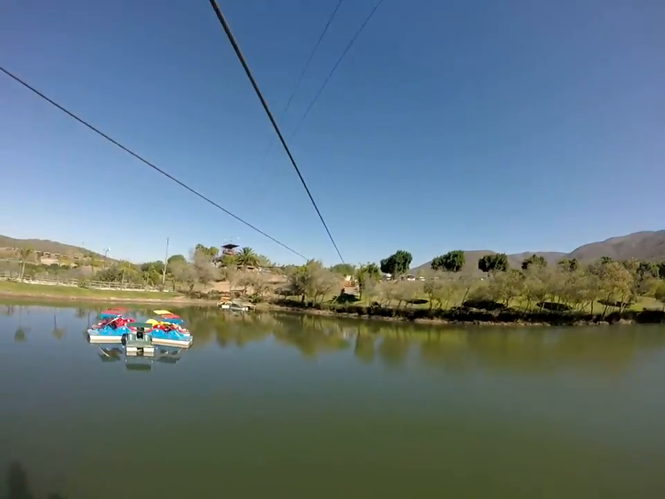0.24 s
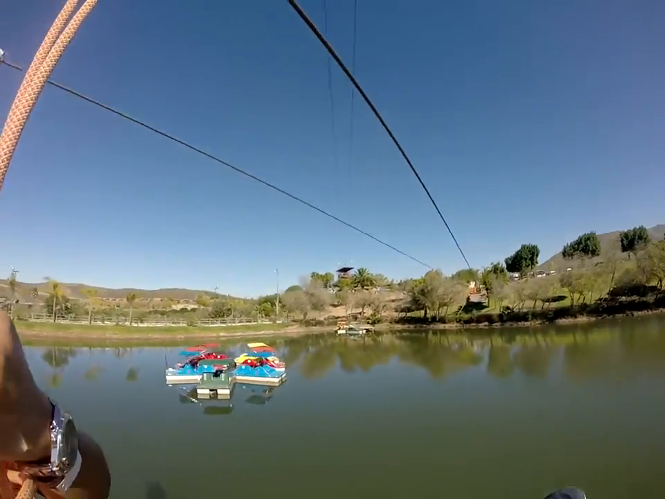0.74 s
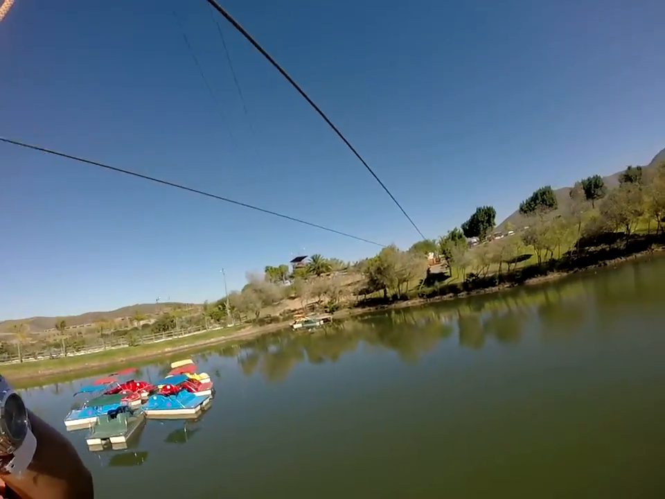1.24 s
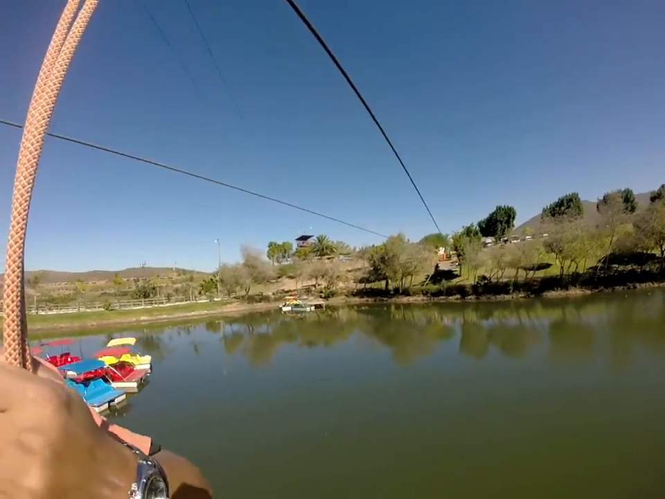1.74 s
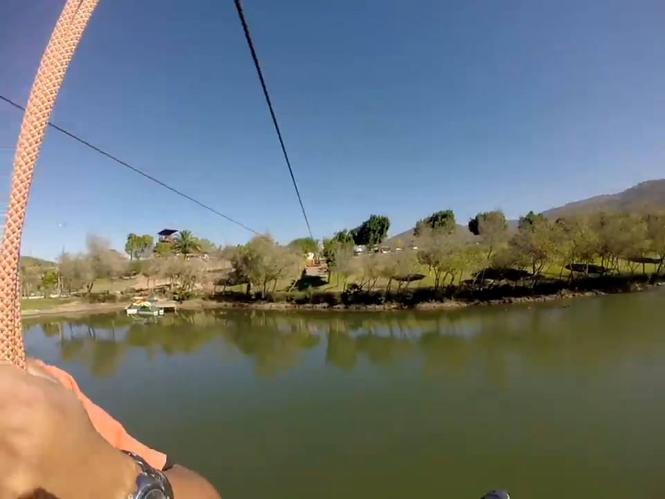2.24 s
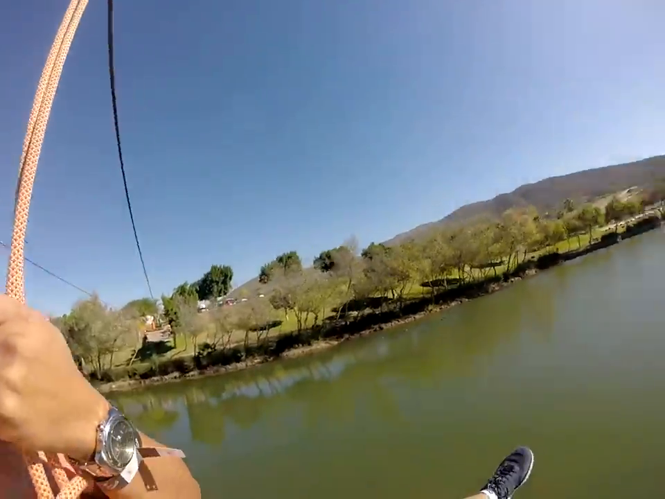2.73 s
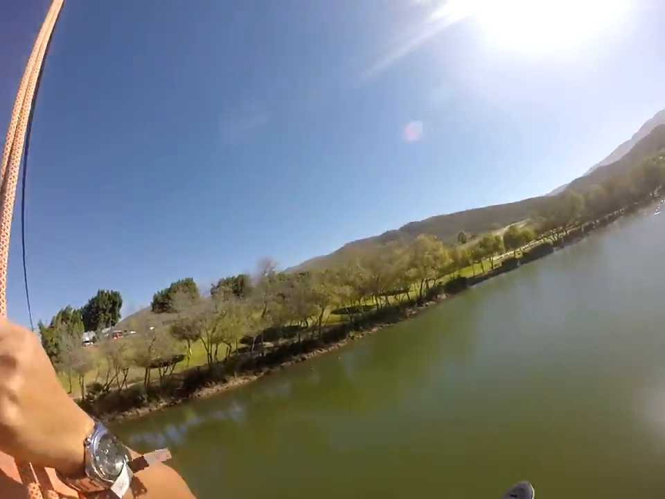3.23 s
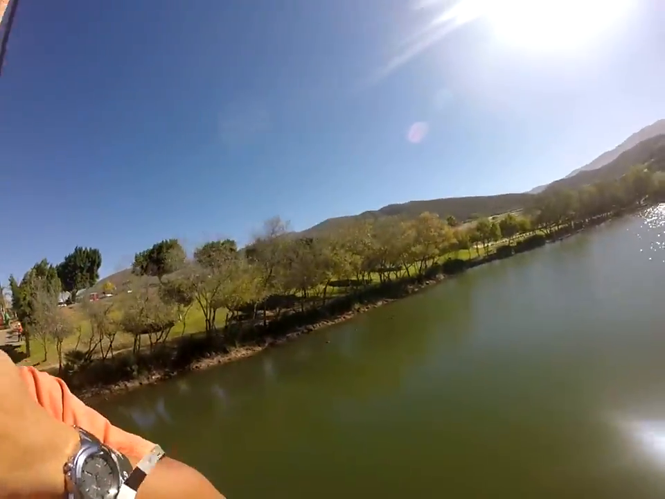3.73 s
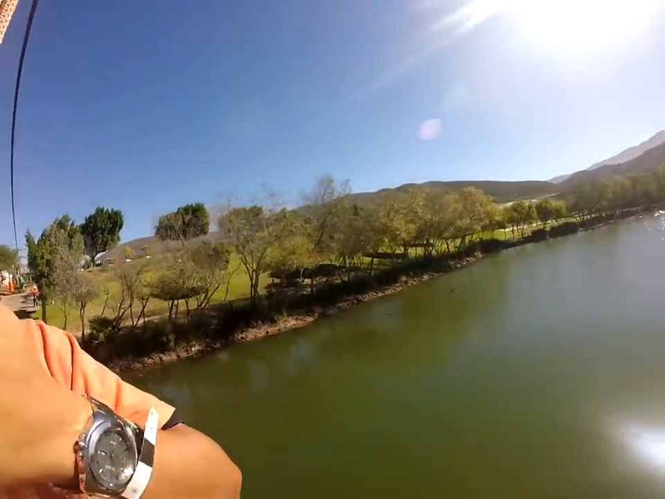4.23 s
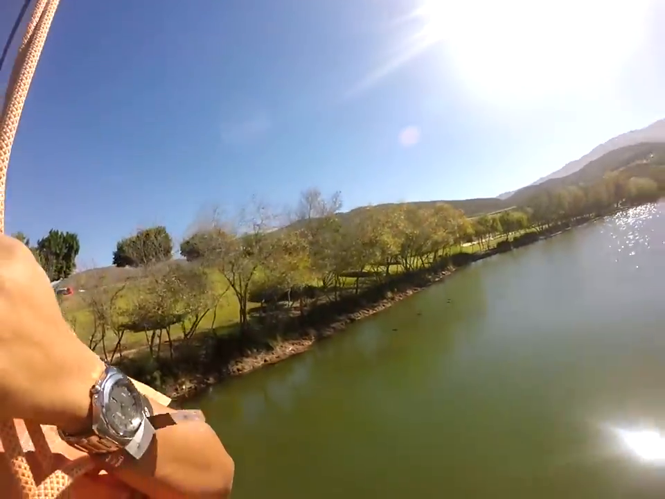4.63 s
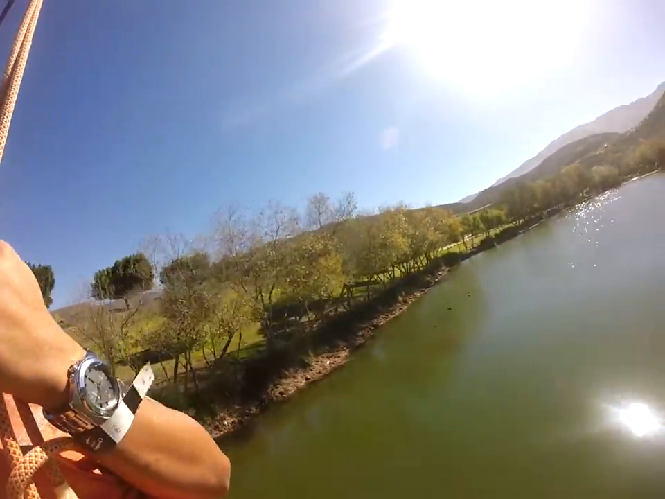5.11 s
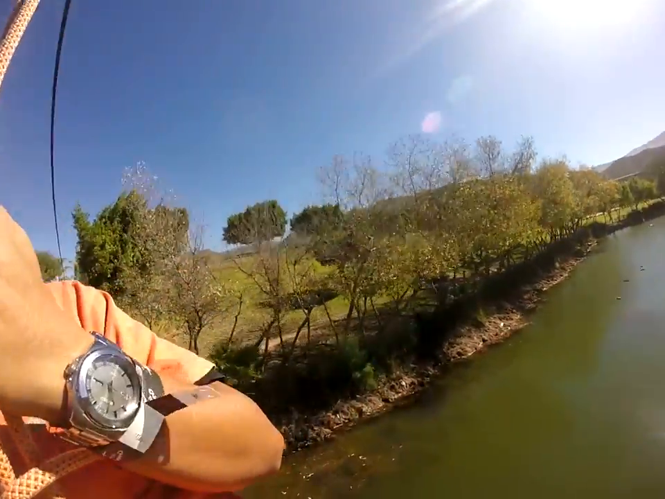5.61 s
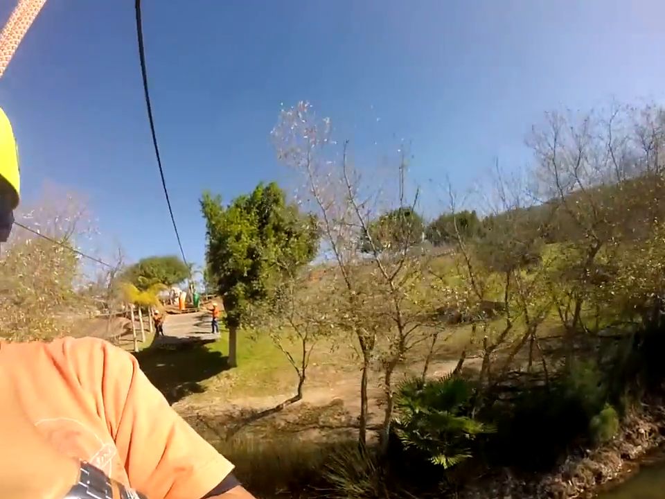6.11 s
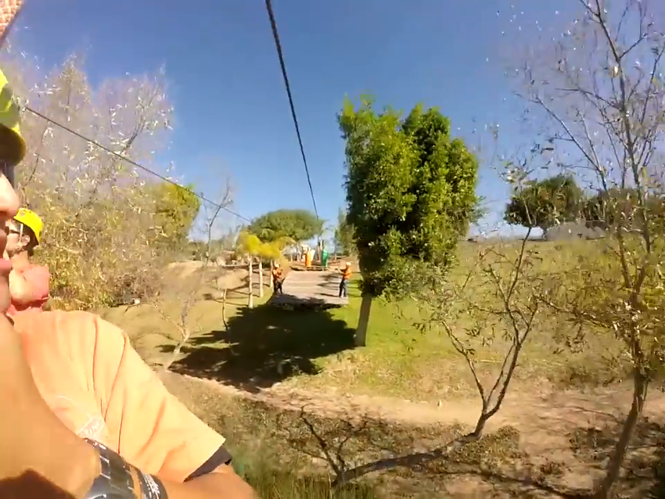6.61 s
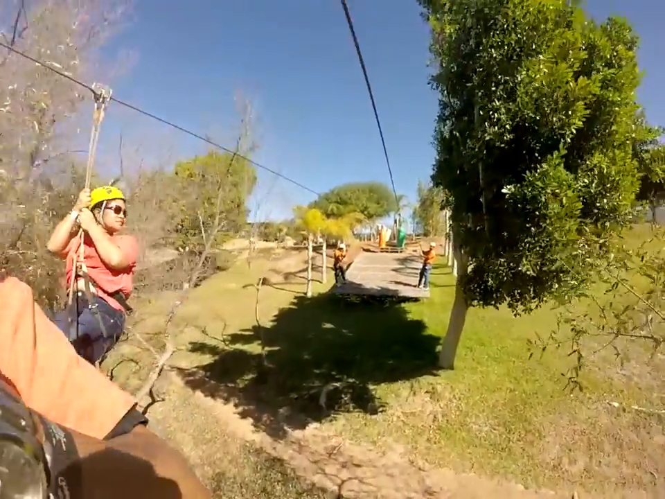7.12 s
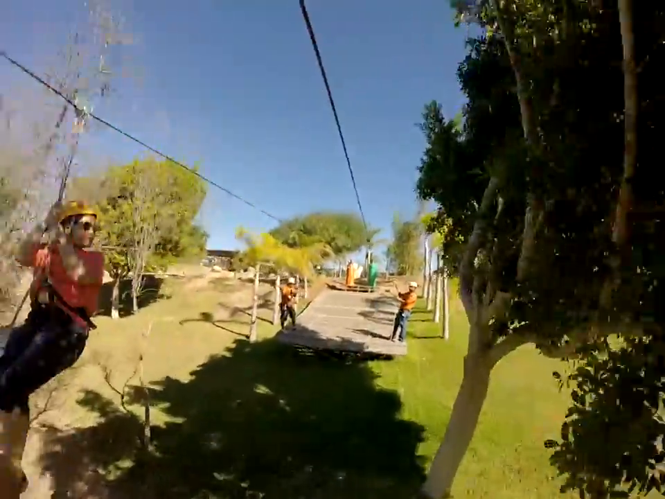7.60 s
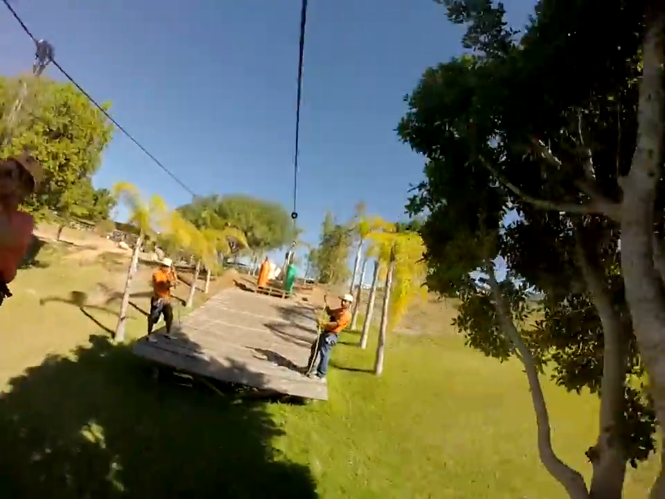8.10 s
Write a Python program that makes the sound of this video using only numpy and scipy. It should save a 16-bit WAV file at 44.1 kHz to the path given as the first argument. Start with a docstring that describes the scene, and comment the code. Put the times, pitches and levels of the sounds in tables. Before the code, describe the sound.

Steady metallic zing of wheels on a zipline, heard close by the rider, gradually slowing as wind flutters and thumps and clacks cluster at the end.

```python
"""Zipline ride

A zipline trolley runs along a steel cable, slowly losing speed, heard from a camera carried by the rider.
Rough contact filtered by steel resonances makes the wheels ring; the strands add a falling harmonic whine.
Both swell as the rider swings. Wind noise rumbles and flutters on the housing.
Gear bumps and taps, most of them near the landing, excite decaying modes; a strap rubs near the end."""
import sys
import numpy as np
from scipy import signal
from scipy.fft import rfft, irfft
from scipy.io import wavfile
from scipy.ndimage import uniform_filter1d, minimum_filter1d, map_coordinates

SR = 44100
rng = np.random.default_rng(int(sys.argv[2]) if len(sys.argv) > 2 else 0)


def generate_wav(sig):
    """Save sig (samples, or channels by samples) to the path in sys.argv[1] as 16-bit PCM at SR."""
    pcm = np.round(np.clip(np.atleast_2d(sig).T, -1, 1) * 32767).astype(np.int16)
    wavfile.write(sys.argv[1], SR, pcm)


N = 368235
T = np.arange(N) / SR  # s
FREQS = np.maximum(np.arange(N // 2 + 1) * SR / N, 1)  # Hz, kept above zero for logarithms

# strands passing under the wheels per second, as the run begins
START_HZ = 658

# modes of the camera housing: (frequency [Hz], 60 dB decay time [s], relative level [dB])
HOUSING_MODES = [(164, 0.086, -5), (288, 0.023, -15), (424, 0.021, -8.5), (518, 0.055, -6.5),
                 (742, 0.11, -5), (788, 0.042, 4.5), (955, 0.022, 11.5), (1210, 0.011, 12),
                 (1430, 0.048, 3.5), (1490, 0.0097, -6), (2170, 0.023, 6.5), (2450, 0.012, 10)]


def undb(db):
    """Amplitude gain is ten to the power of the level in decibels over twenty."""
    return 10 ** (np.asarray(db) / 20)


def unit(x):
    """Normalisation: division by the root mean square gives rms 1."""
    return x / np.sqrt(np.mean(x ** 2))


def curves(table):
    """Linear interpolation over time of each column after the first, which holds the times."""
    times, *columns = np.transpose(table)
    return [np.interp(T, times, column) for column in columns]


def response(points, hz):
    """Frequency response: gain from (frequency [Hz], level [dB]) points on a logarithmic frequency axis."""
    point_hz, db = np.transpose(points)
    return undb(np.interp(np.log(hz), np.log(point_hz), db))


def shape(x, gain):
    """Linear filtering: multiplication of the spectrum by a gain for each frequency."""
    return irfft(rfft(x) * gain, N)


def noise(points):
    """Coloured noise: white noise shaped by a frequency response, rms 1."""
    return unit(shape(rng.standard_normal(N), response(points, FREQS)))


def walk(cutoff_hz):
    """Slow random motion: white noise low-passed to half amplitude at the cutoff, rms 1."""
    return unit(shape(rng.standard_normal(N), 1 / (1 + (FREQS / cutoff_hz) ** 4)))


def add(out, s, sound):
    """Superposition: a sound is summed into the output from time s [s]."""
    start = int(max(s, 0) * SR)
    out[start:start + len(sound)] += sound[:max(N - start, 0)]


def hump(s, length):
    """Raised-cosine envelope: it rises to 1 at time s and falls back to 0, lasting length [s] in all."""
    return np.cos(np.pi * np.clip((T - s) / length, -.5, .5)) ** 2


def swing(lead_s):
    """Pendulum motion of the rider under the trolley: a sinusoid between -1 and 1."""
    period_s, heaviest_load_s = 1.773, 0.26
    return np.cos(2 * np.pi * (T + lead_s - heaviest_load_s) / period_s)


def dips():
    """Level modulation in dB: ring and whine duck suddenly, as if camera gain fell, then recover as a Gaussian."""
    # sudden ducks in level: (time [s], depth [dB])
    ducks = [(.29, -2.5), (2.3, -2), (2.85, -1), (6.03, -3.5), (7.27, -1.6), (7.95, -4)]
    fall_s, recover_s = 0.021, 0.48
    level_db = 0
    for s, db in ducks:
        fall = np.clip((T - s) / fall_s, 0, 1)
        recovery = np.exp(-((T - s) / recover_s) ** 2)
        level_db = level_db + db * fall * recovery
    return level_db


def wind(buffet_db=2.5):
    """Turbulence: eddies buffet the housing with a deep rumble and a lighter flutter, varied by gusts."""
    # spectrum of the rumble: (frequency [Hz], level [dB])
    rumble_colour = [(10, -4), (25, 5.5), (50, 1.5), (70, -1.5), (98, -1), (130, -15.5), (200, -21.5),
                     (400, -36)]
    # spectrum of the flutter: (frequency [Hz], level [dB])
    flutter_colour = [(80, -16), (150, 2), (230, -0.5), (330, -8.5), (700, -6.5), (1000, -10.5),
                      (2000, -40)]
    # gusts: (time of the height [s], length [s], change of the rumble [dB], change of the flutter [dB])
    gusts = [(.05, 1.2, 4, 11), (1.46, 1.88, 6.5, 18.5), (2.22, 0.63, 0, 13.5), (2.85, 1.1, 6, 10.5),
             (4.073, 1.23, 10, -12), (5.153, 1.66, 8.5, 8.5), (8.208, 0.8, 13, 8)]
    rumble_db, flutter_db = -40, -59.5  # steady airflow
    for s, length, rumble_change_db, flutter_change_db in gusts:
        gust = hump(s, length)
        rumble_db = rumble_db + rumble_change_db * gust
        flutter_db = flutter_db + flutter_change_db * gust
    rumble = noise(rumble_colour) * undb(rumble_db)
    flutter = noise(flutter_colour) * undb(flutter_db)
    return undb(buffet_db * walk(7.4)) * (rumble + flutter)


def ring(modes, scatter, tilt_db=0):
    """Modal response to one blow: a sum of decaying sines, peak 1, each blow on a slightly different spot."""
    t = T[:SR // 4]
    lowest_hz = modes[0][0]
    out = 0
    for hz, t60, db in modes:
        detune, strength = rng.standard_normal(2)
        # the tilt, in dB per octave, brightens or dulls the blow
        gain = undb(db + 1.2 * strength + tilt_db * np.log2(hz / lowest_hz))
        decay = np.exp(-np.log(1000) * t / t60)
        out = out + gain * np.sin(2 * np.pi * hz * (1 + scatter * detune) * t) * decay
    return out / np.abs(out).max()


def clack(tilt_db, chatter=0.057, chatter_s=0.0053):
    """Impact excitation: an impulse and brief random chatter of the gear ring the housing, peak 1."""
    t = T[:SR // 100]
    force = (t == 0) + chatter * rng.standard_normal(len(t)) * np.exp(-t / chatter_s)
    sound = signal.fftconvolve(force, ring(HOUSING_MODES, scatter=0.083, tilt_db=tilt_db))
    return sound / np.abs(sound).max()


def bumps(push_s=0.0055):
    """Soft impact: a smooth push of finite length excites mostly the low modes of the camera mount."""
    # bumps: (time [s], level before the push smooths the blow [dB])
    bump_times = [(0.183, -19), (0.461, -12), (.479, -11), (.973, -17.5), (1.07, -19.5), (1.78, -19.5),
                  (5.316, -9), (6.051, -2), (7.307, -3), (7.378, -8), (7.482, -14.5), (7.521, -8),
                  (7.539, -6), (7.956, -5.5), (7.973, -13.5), (8.003, -11), (8.064, -6.5), (8.175, -5.5),
                  (8.238, -9), (8.266, -11), (8.34, -11)]
    # mount modes: (frequency [Hz], 60 dB decay time [s], relative level [dB])
    mount_modes = [(48.3, 0.15, -2), (97.2, 0.13, 10), (125.7, 0.1, 7.5), (170, 0.043, -34),
                   (246, 0.057, -3.5)]
    out = np.zeros(N)
    push = np.hanning(int(push_s * SR) + 3)
    push = push / push.sum()
    for s, db in bump_times:
        blow = np.convolve(ring(mount_modes, scatter=0.084), push)
        add(out, s - push_s / 2, undb(db) * blow)
    return out


def taps(lift_db=1):
    """Hard impact: short blows of gear excite the housing's modes."""
    # taps: (time [s], peak level before the common lift [dB], brightness [dB per octave])
    tap_times = [(0.184, -21.5, -1), (0.454, -16, -8), (.974, -14.5, -5), (1.073, -18, -5),
                 (1.782, -18.5, -2), (5.315, -6, 2), (6.05, -4.5, -9.5), (6.16, -27, -4), (7.315, -23, 0),
                 (7.373, -5, 8.5), (7.478, -20.5, -2), (7.502, -19, -8), (7.521, -12.5, -5),
                 (7.564, -23, 1), (7.592, -18, -3), (7.635, -24, -4), (7.657, -14, 6), (7.689, -22, -2),
                 (7.91, -20, 2), (7.947, -13, 4), (8.131, -16.5, 5), (8.228, -24, -11)]
    out = np.zeros(N)
    for s, db, tilt_db in tap_times:
        add(out, s, undb(db + lift_db) * clack(tilt_db))
    return out


def strap_rub():
    """Stick-slip friction: a strap scrapes over the housing in tiny random slips that ring its modes."""
    # strength of the rub: (time [s], level [dB])
    rub = [(8.17, -62), (8.235, -29), (8.262, -27), (8.29, -48), (8.33, -60)]
    slips = rng.standard_normal(N) * (rng.random(N) < 500 / SR)  # about 500 per second
    scrape = signal.fftconvolve(slips, ring(HOUSING_MODES, scatter=0.02, tilt_db=-1))[:N]
    started = T > rub[0][0]
    return unit(scrape) * undb(curves(rub)[0]) * started


def tone(hz, flutter, waver_db=2.0, wobble=0.002988):
    """Frequency and amplitude modulation: a sine unsteady in pitch and strength, rms 1."""
    unsteady_hz = hz * (1 + flutter * walk(62.0) + wobble * walk(6.27))
    phase = 2 * np.pi * np.cumsum(unsteady_hz) / SR
    return unit(np.sin(phase) * undb(waver_db * walk(32)))


def cable_rush(trim_db=-0.5):
    """Broadband noise: the cable's dull rush, slowly varied in level."""
    # strength of the rush: (time [s], level before the trim [dB])
    rush = [(0.0, -40.5), (0.49, -37.5), (1.42, -34), (2.37, -36.5), (5.6, -39), (5.95, -43), (6.4, -41),
            (7.2, -37.5), (8.35, -35.5)]
    # spectrum of the rush: (frequency [Hz], level [dB])
    rush_colour = [(200, -10), (450, -14), (800, -12.5), (1100, -6), (1420, 1), (1580, -8), (1930, 4),
                   (2300, -10.5), (3000, 6), (5000, -23), (15000, -45)]
    return noise(rush_colour) * undb(curves(rush)[0] + trim_db + 0.55 * walk(43))


def strand_whine(strand_hz):
    """Periodic excitation: twisted strands bump the wheels, giving harmonics that fall with speed."""
    # strand harmonics: (multiple of the strand rate, relative level [dB], pitch flutter [share of pitch])
    harmonics = [(1, 2, .014), (2, -0.5, 0.0087), (3, 0, 0.00567), (4, -2.5, 0.00803)]
    # how strongly the frame radiates a harmonic: (frequency [Hz], gain [dB])
    frame = [(400, -69.5), (580, -58), (680, -59.5), (850, -64.5), (1020, -54), (1200, -50.5), (1370, -46),
             (1520, -52), (1720, -46), (1950, -43.5), (2300, -49), (2480, -48), (2620, -33.5)]
    level_db, swing_db, lead_s = 1.22, 1.5, 0.42
    whine_db = level_db + swing_db * swing(lead_s) + dips()
    out = 0
    for multiple, db, flutter in harmonics:
        hz = multiple * strand_hz
        out = out + tone(hz, flutter) * response(frame, hz) * undb(db + whine_db)
    return out


def early_whine(overtone_db=-5):
    """Two-partial tone: a second whine and its octave fall in pitch and sink away early."""
    # course of the whine: (time [s], frequency [Hz], level [dB])
    whine = [(0, 900, -41), (.15, 894, -42), (.5, 844, -48.5), (.9, 760, -49), (1.4, 710, -109)]
    hz, db = curves(whine)
    fundamental = tone(hz, 0.0044, wobble=0.009)
    octave = tone(2 * hz, 0.0032)
    return undb(db) * (fundamental + undb(overtone_db) * octave)


def contact(strand_hz, strands_per_turn=11.8, repeat_db=-7, judder_db=0.36):
    """Roughness excitation: ever new cable roughness plus that of two wheels, which returns every turn."""
    turns = np.cumsum(strand_hz) / SR / strands_per_turn
    force = rng.standard_normal(N)
    for _ in range(2):
        tread = rng.standard_normal(size=640)
        slip = np.cumsum(.1 * walk(6.037)) / SR  # turns
        place = (turns + slip) % 1 * len(tread)
        force = force + undb(repeat_db) * map_coordinates(tread, [place], order=3, mode="grid-wrap")
    return force * undb(judder_db * walk(36))


def trolley_ring(strand_hz, wander_db=4.0):
    """Resonance: the contact force rings the steel, and the turn of the rider's body sets which modes carry."""
    # wheel and side-plate resonances: (frequency [Hz], width where the gain is 4.5 dB down [Hz],
    # level facing ahead [dB], level sideways [dB], level leaning out [dB])
    resonances = [(2623, 78, -14.5, -21.5, -16.5), (2820, 105, -29, -15.5, -18.5),
                  (3285, 340, -9.5, -6.5, -8), (3400, 95, -19.5, -7, -5), (3554, 94, 0.5, 4, 7.5),
                  (3732, 50, -15, -10.5, -19), (3990, 155, -13, -9.5, -14), (4153, 53, -21, -20, -26),
                  (4477, 134, -22.5, -19.5, -24), (4916, 580, -14.5, -22, -26),
                  (5590, 190, -24.5, -23.5, -29), (6050, 170, -16.5, -15.5, -17),
                  (6456, 280, -16, -12.5, -41), (7036, 167, -16, -25, -14.5), (7470, 310, -34, -30, -27),
                  (8245, 330, -23.5, -29.5, -32), (9590, 720, -29, -32.5, -28),
                  (10620, 150, -30, -29.5, -52), (11400, 490, -43, -42, -51), (12600, 310, -44, -37, -54),
                  (12950, 360, -41, -42, -45), (13600, 1900, -45, -57, -58)]
    # the rider swivels and shades the trolley: (time [s], pose [0 ahead, 1 sideways, 2 leaning out])
    poses = [(2, 0), (3, 0.71), (4.5, 0.54), (6.5, 1.26), (6.9, 1.44), (8.35, 1.7)]
    # two plate modes cancel here
    notch_hz, notch_width_hz, notch_db = 4270, 87, -10.5
    notch = undb(notch_db * np.exp(-((FREQS - notch_hz) / notch_width_hz) ** 2))
    force = rfft(contact(strand_hz)) * notch
    pose, = curves(poses)
    steel = 0
    for hz, width, *pose_db in resonances:
        mode = irfft(force / (1 + (1.64 * (FREQS - hz) / width) ** 2), N)
        # the cable wanders in the groove, and the high modes feel it most: wander_db applies at 7 kHz
        wander = np.interp(T, np.linspace(0, T[-1], num=20), rng.standard_normal(size=20))
        wander = wander * wander_db * hz / 7000
        steel = steel + mode * undb(np.interp(pose, np.arange(len(pose_db)), pose_db) + wander)
    return steel


def wheels(strand_hz, drift=.003, jostle_db=0.8):
    """Load and speed dependence: the swinging load swells the ringing, and the treble dulls with slowing."""
    # ring, rasp and fine hiss of the wheels: (level at the starting speed [dB], swing [dB],
    # lead on the swing [s], change per doubling of speed [dB])
    rolling = [(-15, 0.8, 0.046, -1.2), (-23.5, .5, .4, 5), (-35.5, 0.3, 0.57, 4.5)]
    # brief shifts of colour: (time of the height [s], length [s], ring [dB], rasp [dB], fine hiss [dB])
    colour_shifts = [(3.55, 0.71, 0.5, 1.5, 1), (5.11, 2, -2, 1.1, 1.2), (6.26, 1.3, -0.5, 0.5, -3)]
    steel = trolley_ring(strand_hz)
    unsteady_db = dips() + jostle_db * walk(4.8)
    shifts = sum(np.outer(band_db, hump(s, length)) for s, length, *band_db in colour_shifts)
    doublings = np.log2(strand_hz / START_HZ)
    edges = [0, 4320, 7750, SR]  # Hz
    bands = []
    for low, high, shift_db, settings in zip(edges, edges[1:], shifts, rolling):
        db, swing_db, lead_s, speed_db = settings
        band = shape(steel, (FREQS >= low) & (FREQS < high))
        # even out the band's running rms, then set its level
        running_rms = np.sqrt(uniform_filter1d(band ** 2, size=6000))
        level_db = db + swing_db * swing(lead_s) + speed_db * doublings + shift_db + unsteady_db
        bands.append(band / running_rms * undb(level_db))
    main_ring, rasp, hiss = bands
    # reading at an uneven pace makes the upper resonances drift a little in pitch
    clock = np.cumsum(1 + drift * walk(1))
    return main_ring + map_coordinates(rasp + hiss, [clock], order=5, mode="reflect")


def scene():
    """Superposition: all sources reach one microphone inside the housing, as the strand rate falls with speed."""
    # the rate falls ever faster as the sagging cable climbs to the landing
    drag_hz_per_s, climb_hz_per_s2 = 11.05, 5.72
    strand_hz = START_HZ - drag_hz_per_s * T - climb_hz_per_s2 * T ** 2 / 2
    knocks = bumps() + taps() + strap_rub()
    cable = cable_rush() + strand_whine(strand_hz) + early_whine()
    mono = wind() + knocks + cable + wheels(strand_hz)
    return np.array([mono, mono])


def record(dry, ceiling=0.77, top_hz=14950):
    """Band-limiting and peak limiting: deep bass is shed, a fast limiter holds peaks, the top is cut off."""
    dry = signal.sosfilt(signal.butter(1, 12, "high", fs=SR, output="sos"), dry)
    need = np.minimum(1, ceiling / (np.abs(dry[0]) + 1e-9))
    gain = uniform_filter1d(minimum_filter1d(need, size=120), size=80)
    return signal.sosfilt(signal.ellip(10, .2, 80, top_hz, fs=SR, output="sos"), dry * gain)


dry = scene()
out = record(dry)
generate_wav(out)
```